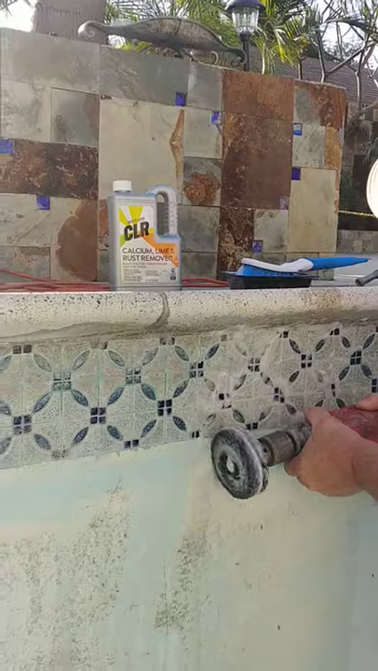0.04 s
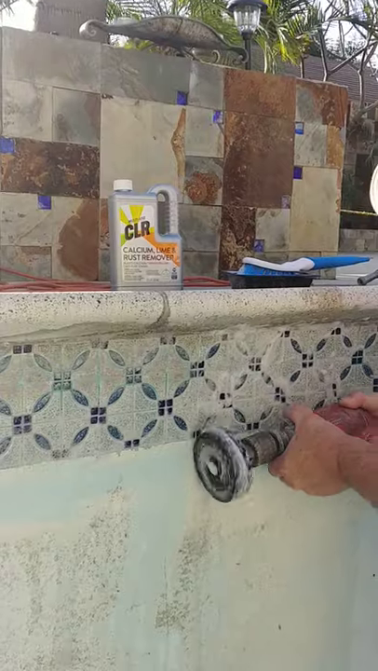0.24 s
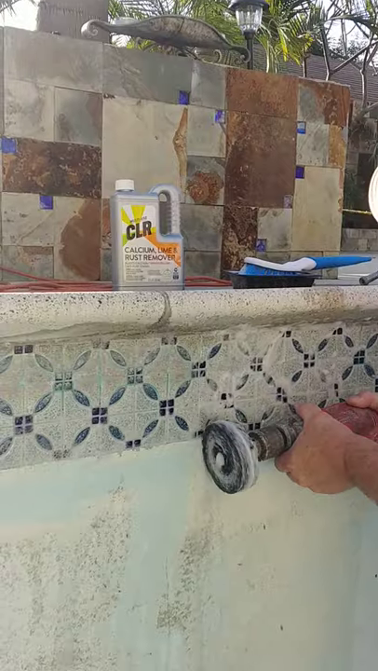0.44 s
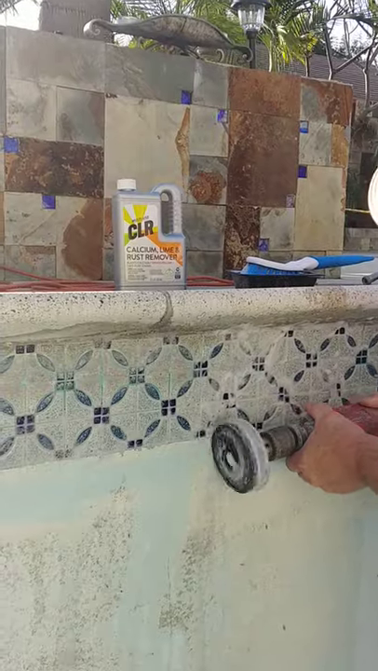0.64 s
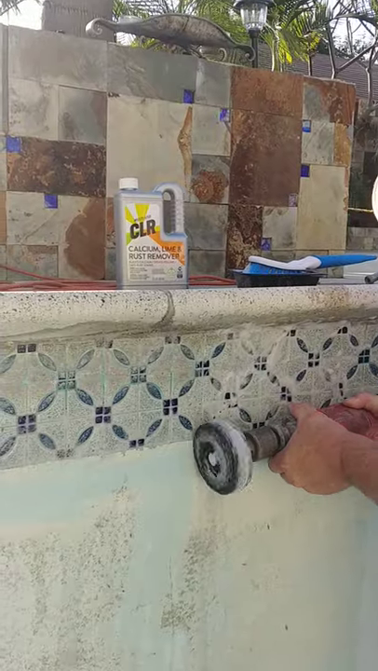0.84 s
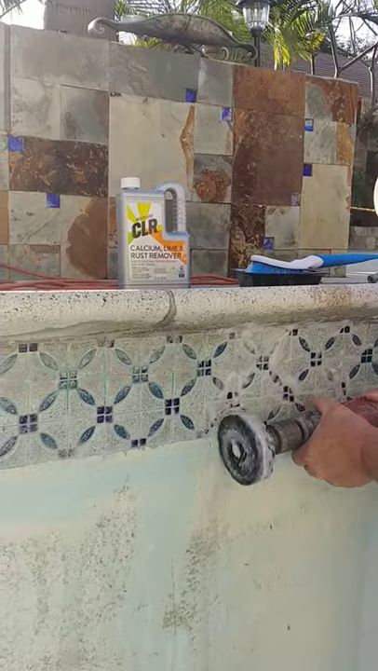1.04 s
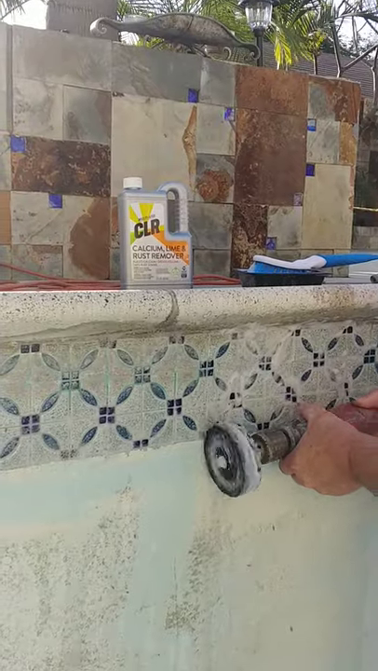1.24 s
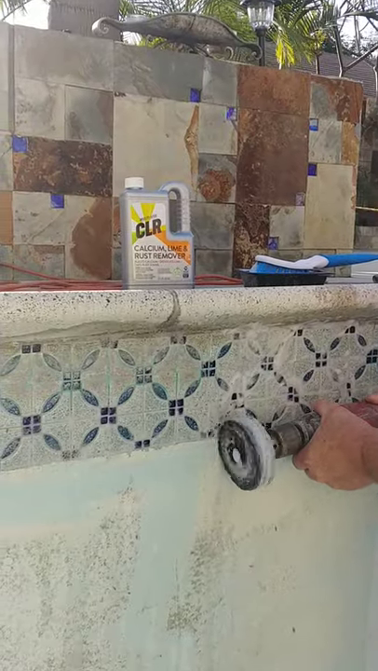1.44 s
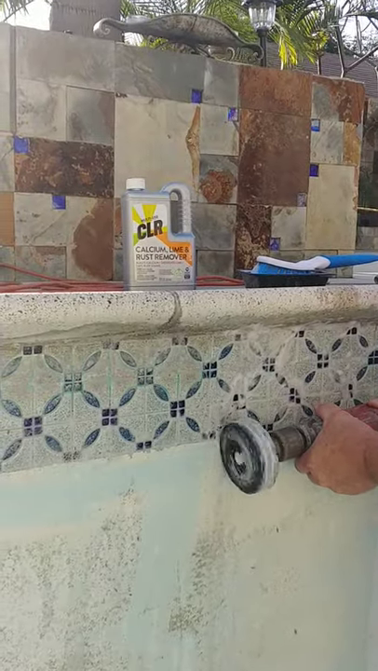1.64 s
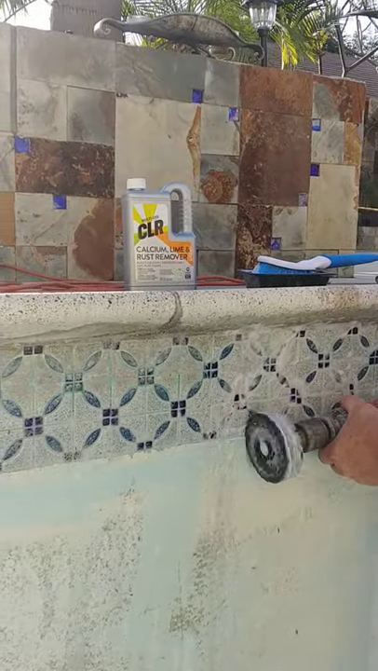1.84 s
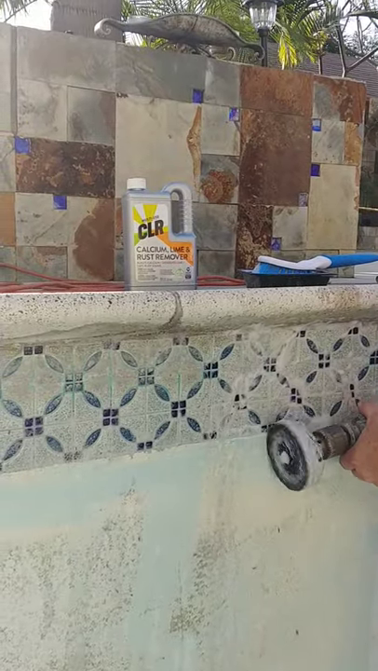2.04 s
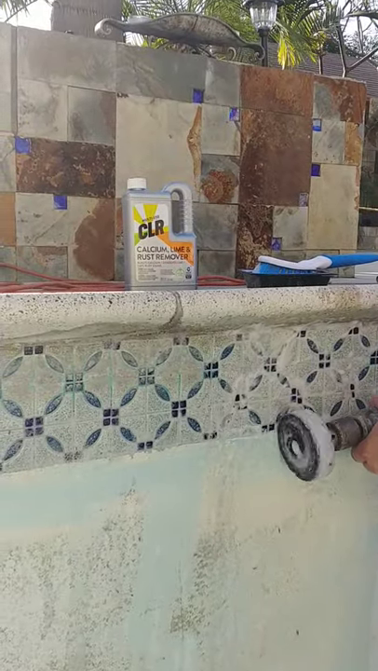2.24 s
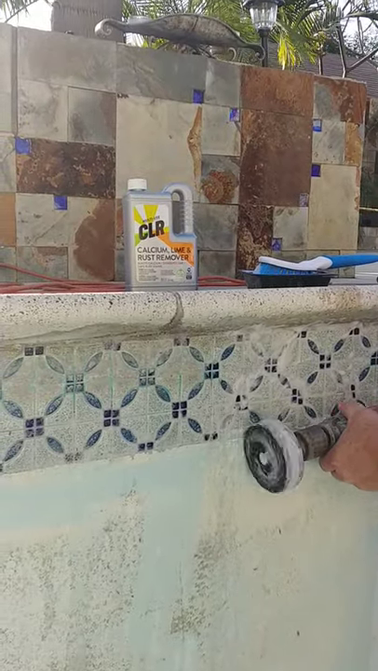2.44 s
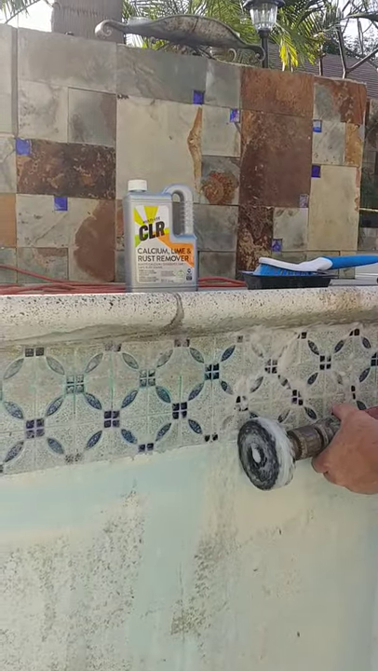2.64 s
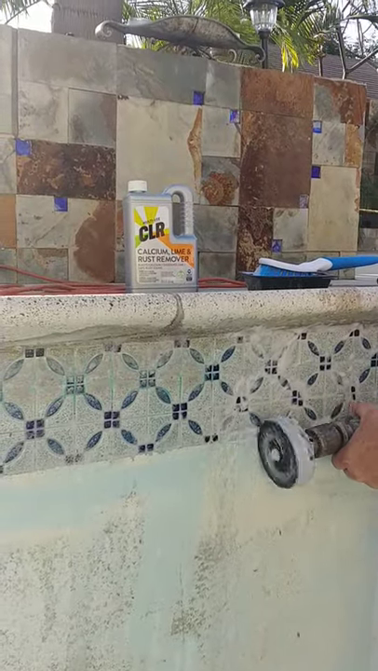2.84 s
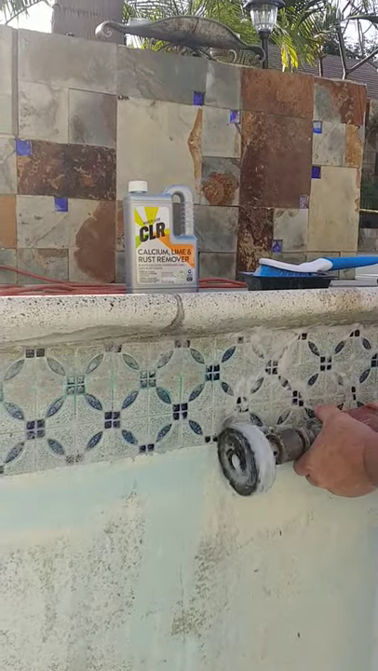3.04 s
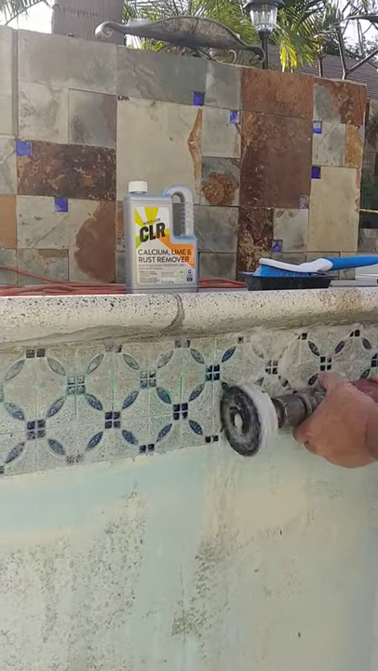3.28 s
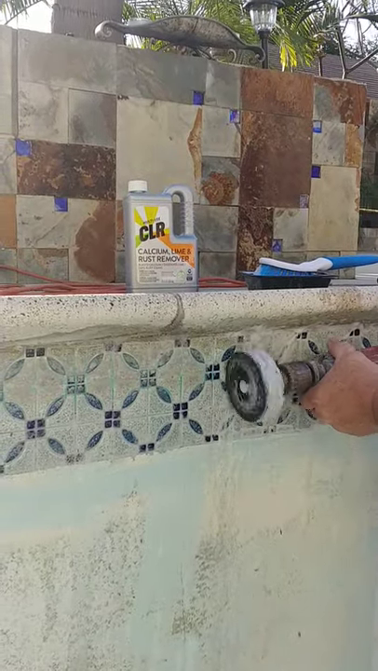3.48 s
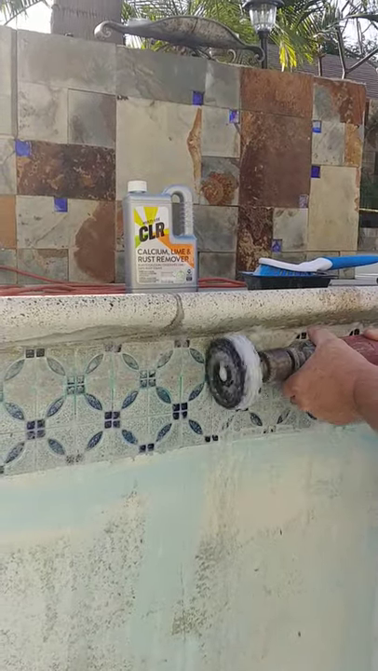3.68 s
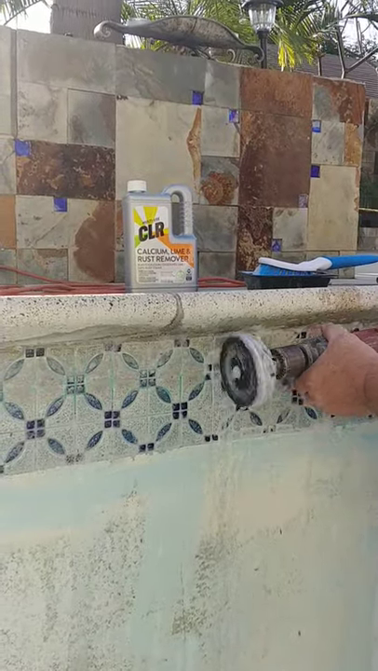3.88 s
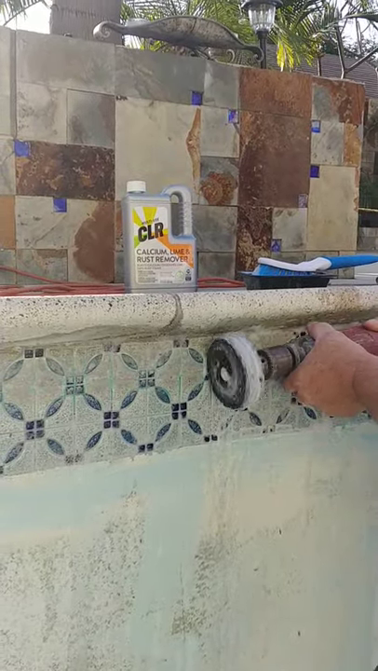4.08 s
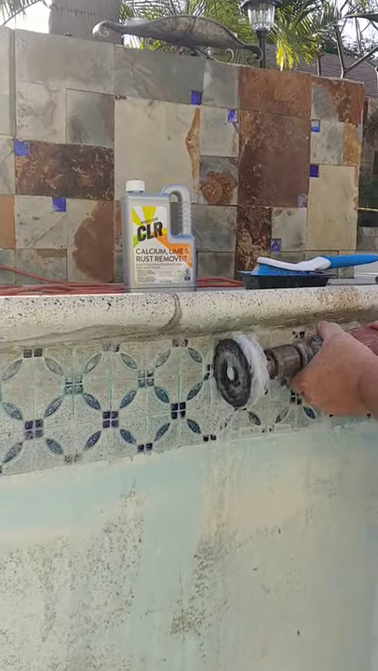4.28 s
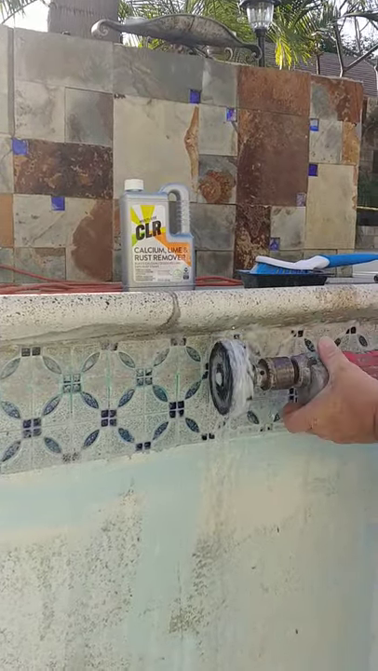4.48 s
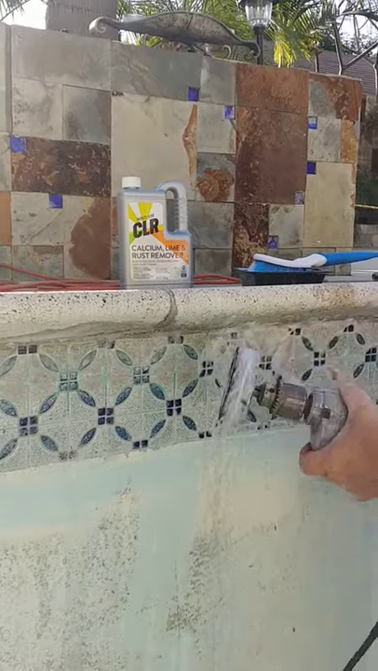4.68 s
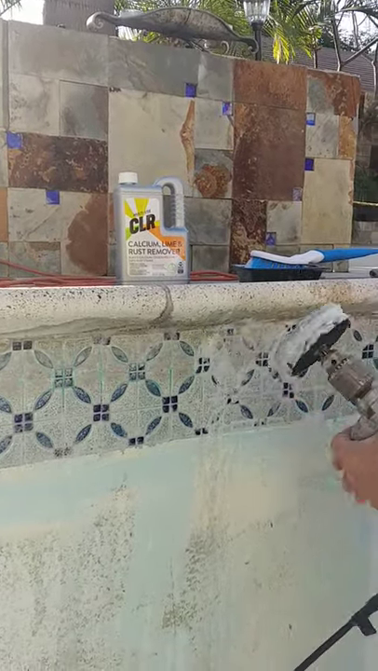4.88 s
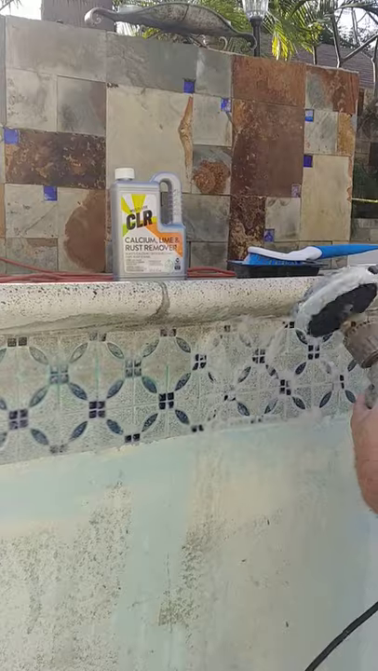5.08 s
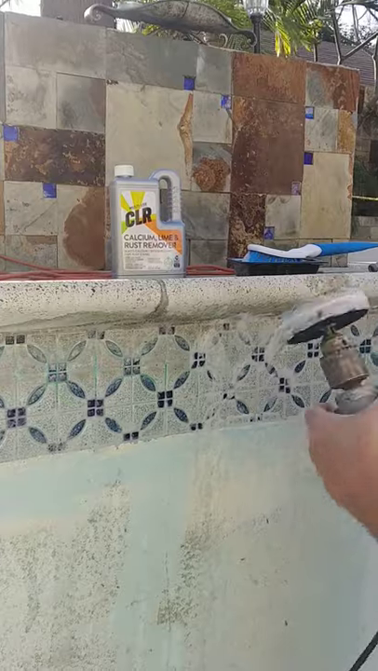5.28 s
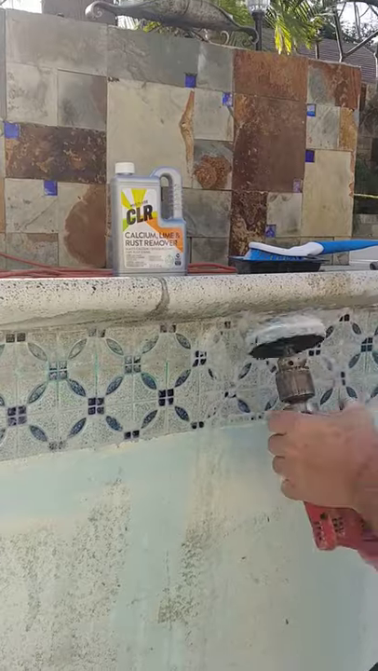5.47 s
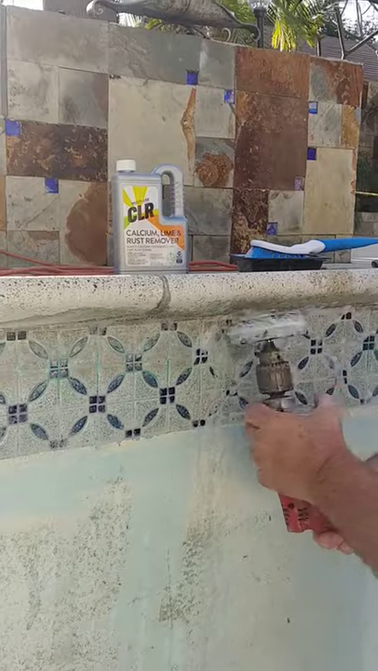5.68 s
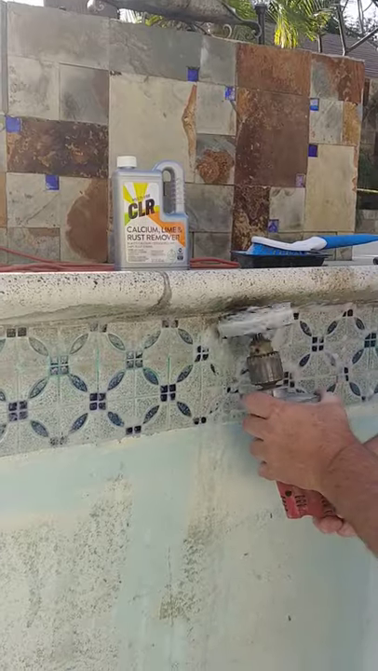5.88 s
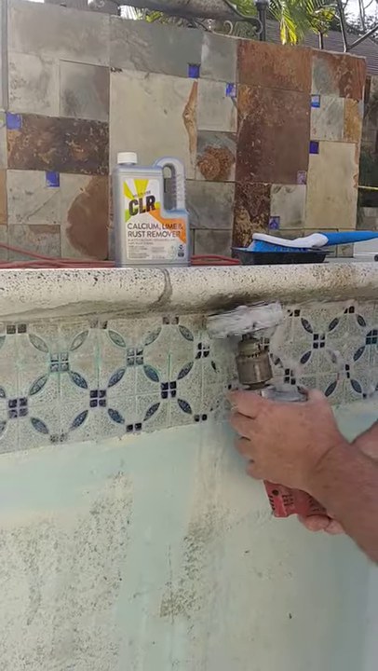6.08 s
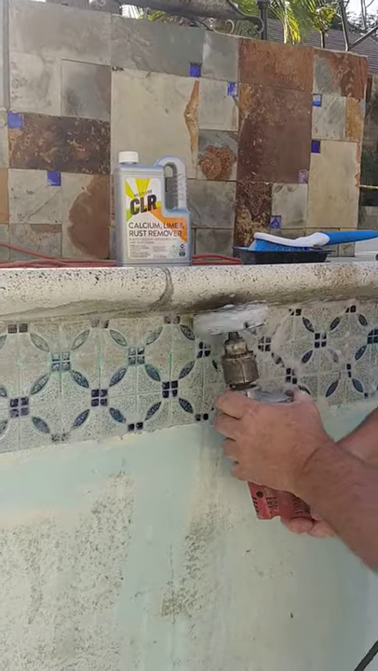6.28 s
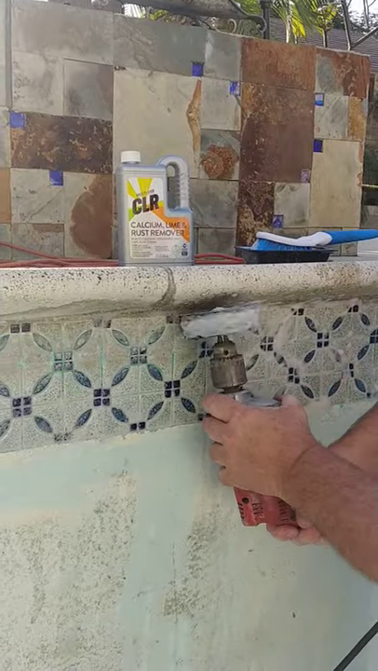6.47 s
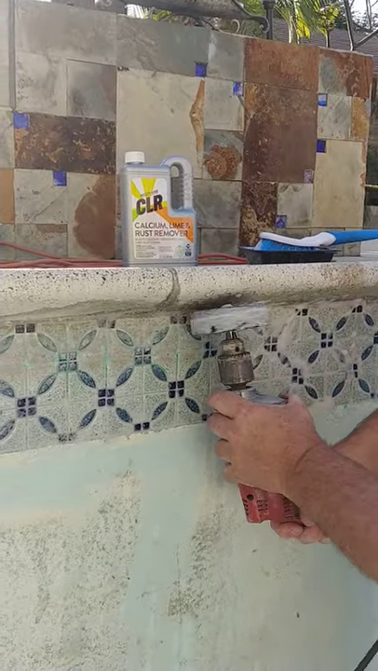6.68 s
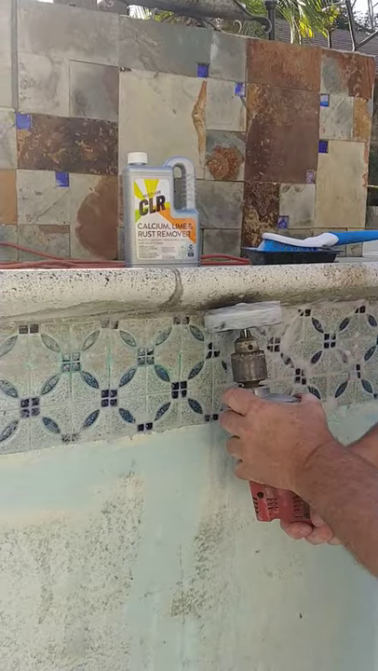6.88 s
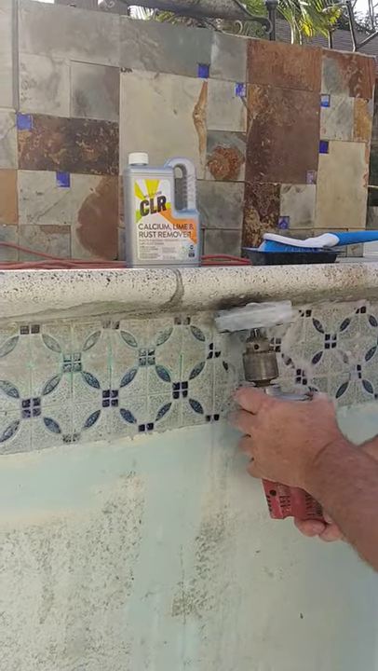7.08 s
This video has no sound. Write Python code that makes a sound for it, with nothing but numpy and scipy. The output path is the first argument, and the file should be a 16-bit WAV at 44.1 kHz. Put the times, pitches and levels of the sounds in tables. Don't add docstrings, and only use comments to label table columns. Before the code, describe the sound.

A power drill whines loudly over gritty grinding on wet tile, coasts down with rattling, then revs up and bites beneath stone.

```python
import sys
import numpy as np
from scipy import signal
from scipy.fft import rfft, irfft, next_fast_len
from scipy.io import wavfile
from scipy.ndimage import uniform_filter1d

SR = 44100
rng = np.random.default_rng(int(sys.argv[2]) if len(sys.argv) > 2 else 0)


def master_out(mix):
    frames = np.transpose(np.atleast_2d(mix))
    ceiling = np.clip(frames, -1, 1)
    pcm = np.round(ceiling * 32767).astype(np.int16)
    wavfile.write(sys.argv[1], SR, pcm)


def to_linear_factor(level_db):
    exponent = np.asarray(level_db, float) / 20
    return 10 ** exponent


N = 313992
FRAME, HOP = 1024, 256
MAINS_PULL_HZ = 120
SPINDLE_RATIO = 0.093
FULL_SPEED_HZ = 270
TRIGGER_OFF_S, LOOSE_UNTIL_S, POWER_ON_S = 4.45, 6.3, 5.7

# (time [s], speed [Hz])
ROTOR_SPEED = [(0, 273.8), (.8, 273.3), (2.16, 267.3), (3.1, 271.2), (3.55, 265.6), (4.3, 252.9),
               (4.42, 257), (4.5, 253.2), (5.15, 177), (5.4, 152.5), (5.73, 131.5), (5.9, 154.5),
               (6.0, 165.5), (6.24, 203), (6.42, 228), (6.6, 246.5), (6.82, 259), (7.12, 268.8)]
# (time [s], 0 on tile 1 high on tile 2 lifted 3 under coping, left over right [dB])
HOLD = [
    (0, 0.011, 1.4),
    (3.1, 0.022, 1.3),
    (3.6, 0.41, 0.2),
    (4.28, 0.46, 0.5),
    (4.36, 1.58, 1),
    (5.75, 1.84, 0.5),
    (6.1, 2.67, 0.1),
    (7.12, 2.5, -1),
]
# (time [s], 0 grinding 1 easing off 2 coasting 3 slow and catching 4 biting)
WORK_STAGE = [
    (0, 0),
    (3.4, 0),
    (3.9, 1),
    (4.27, 1),
    (4.34, 2),
    (5.4, 2),
    (5.62, 3),
    (6.54, 3),
    (6.62, 4),
    (7.12, 4),
]
# (time [s], unsteadiness [dB])
WHEEL_BOUNCE = [(0, .7), (3.5, .8), (4.2, 1.2), (4.4, .6), (5.0, 1.8), (5.35, .3), (5.78, .3), (6.05, 2.5),
                (6.5, 1.5), (7.12, .8)]
# (multiple of rotor speed, tone family 0-5, level over family [dB], left over right [dB])
WHINES = [(7, 0, 0, -4), (14, 1, 0, -1.5), (21, 2, 0, -7), (28, 2, -15, -6.5), (20, 2, -14, -3),
          (12, 3, 0, -6), (24, 3, -16, 0.5), (35, 4, 0, -12), (36, 4, -12, -9.5), (29, 4, -14, -3),
          (30, 4, -12, -2.5), (30.92, 4, -11, -8), (38, 4, -18, -12), (15, 5, 0, -5)]
FAMILY_DB = [
    (-23, -30, -50, -33, -27.5),
    (-38, -33, -48, -41, -33),
    (-36, -30, -44, -33, -26.5),
    (-34.5, -48, -41, -41.5, -34),
    (-37, -43, -42, -43, -35),
    (-45, -52, -45, -42, -38),
]
FAMILY_WANDER_DB = (1.2, 2, 2.2, 1.5, 1.2, 2.5)
# (time [s], half length [s], lift [dB])
WHEEL_BITES = [
    (6.06, .06, 12),
    (6.225, .05, 12),
]
# (time [s], half length [s], lift [dB])
CASE_SINGING = [(1.72, .3, 15), (2.52, .08, 10), (6.85, .2, 6)]
# (multiple of the pull, level [dB])
SLOT_BEATS = [(-2, -3.5), (-1.4, 0.5), (1, -9), (2.9, -10)]
# (multiple of rotor speed, case pitch [Hz], half width [Hz], lift powered [dB], lift coasting [dB])
CASE_CROSSINGS = [(12, 2540, 280, 21, 0), (12, 1680, 120, 0, 6), (14, 2420, 80, 9, 0),
                  (14, 3130, 90, 17, 8), (14, 3480, 130, 8, 0), (21, 3100, 300, 14, 0),
                  (21, 4050, 120, 12, 4), (28, 5600, 200, 10, 0), (35, 7600, 700, 12, 2),
                  (35, 5900, 400, 0, 10), (7, 1030, 60, 0, 6)]
# (multiple of rotor speed, level on tile [dB], change off tile [dB])
ROTOR_SHAKE = [(1, -48.5, -3), (2, -38.5, -10), (3, -43.5, -6)]
# (multiple of rotor speed, level [dB], spread [Hz], case pitch [Hz],
# reach [Hz])
LOOSE_GEARS = [(5.5, -31, 45, 1220, 110), (19, -30, 350, 3800, 300), (14.2, -28, 120, 3020, 110),
               (21.5, -29, 250, 4250, 170)]
# (pitch [Hz], level per Hz [dB])
TILE_COLOUR = [(120, -64), (200, -32.5), (456, -26), (532, -15.5), (1680, -13), (1930, -6), (2140, -11.5),
               (5580, -18.5), (6410, -22.5), (9670, -30.5), (12100, -42), (15700, -77), (22000, -120)]
HIGH_TILE_COLOUR = [(120, -50), (200, -22), (514, -9.5), (1370, -8.5), (1860, -5.5), (4390, -11.5),
                    (5490, -3), (6300, -21.5), (8290, -29.5), (12100, -37.5), (15700, -68), (22000, -120)]
LIFTED_COLOUR = [(120, -48), (200, -20), (282, -34), (505, -9), (1190, -2), (2250, -14), (4240, -6),
                 (6300, -15.5), (8290, -15.5), (12100, -29.5), (15700, -65), (22000, -120)]
COPING_COLOUR = [(120, -58), (200, -40), (541, -21), (1460, -19.5), (1800, -4.5), (1960, -10), (5400, -7.5),
                 (6410, -4), (9190, -15.5), (12100, -25.5), (15700, -66), (22000, -120)]
# (pitch [Hz], width [Hz], then lift on tile, high on tile, lifted, under coping [dB])
CASE_RINGING = [(1092, 200, 6, 7.1, 3.3, 6.3), (1530, 410, 2.4, 0.66, 1.8, 0.86),
                (1943, 130, 1.4, 9.5, 0.38, 0.92), (2255, 260, 1, 13.4, 0.31, 5.5),
                (2700, 700, 0.5, 0.27, 6.6, 6.6), (3297, 160, 2.1, 19.5, 3.2, 8.5),
                (3950, 250, 1.3, 2.1, 1.4, 5.7), (8000, 870, 4.9, 2.9, 1.2, 3.32)]
# (time [s], level [dB])
RATTLE_EFFORT = [(0, -15.5), (1.35, -15), (2.7, -16), (3.0, -15), (3.25, -16.5), (4.0, -16), (4.27, -16),
                 (4.43, -19.5), (4.95, -21.5), (5.3, -22), (5.41, -25), (5.8, -26), (5.95, -24),
                 (6.08, -17.5), (6.15, -18.5), (6.36, -16), (6.55, -15.5), (7.12, -15)]
WALL_BOOM_DB = (-7.5, -9, -7, -13, -12.5)
FAN_HISS_DB = (-9.5, -11.5, -9, -9.5, -9)
# (time [s], peak [dB])
GEAR_KNOCKS = [(4.9378, -10), (5.0024, -11), (5.0344, -11), (5.059, -8), (5.0724, -14), (5.1872, -10),
               (5.2274, -12), (5.8098, -13), (5.8714, -12), (5.9778, -10), (6.0203, -8), (6.0886, -9),
               (6.1151, -9), (6.1675, -12), (6.1924, -7), (6.4179, -5)]
# (time [s], peak [dB], decay [ms])
COPING_SCUFF = (5.853, -14.5, 31)
# (pitch [Hz], level per Hz [dB])
PUMP_COLOUR = [(20, -35), (36, -9), (55, 8), (75, 0), (155, -12), (300, -9), (420, -10), (660, -90)]
# (pitch [Hz], likeness [0-1])
STEREO_LIKENESS = [(30, .3), (60, 0.33), (140, 0.77), (350, 0.93), (700, 0.95), (1300, 0.8), (2500, 0.6),
                   (4840, 0.29), (8000, 0.36), (11600, .2)]
# (pitch [Hz], left over right [dB])
STEREO_LEAN = [(60, -6), (140, 2), (350, -1.5), (840, -2), (2010, -5.5), (4840, -3.5), (9500, -9.5),
               (11300, -12.5), (12000, 19)]
# (pitch [Hz], left ahead of right [radians])
STEREO_LEAD = [(600, 0), (1800, -.4), (2600, .3), (4000, .7), (8000, .2), (11000, 1.5)]
# (pitch [Hz], gain [dB])
HOUSING_GAIN = [(4800, 0.16), (5700, 3), (6000, -7.5), (6500, -9.5), (7400, -2.84), (10800, 1),
                (11600, -5.5), (12200, -1)]


def whine(turns, rotor_hz):
    s = np.arange(N) / SR
    out = np.zeros((2, N))
    levels = tone_levels(rotor_hz)
    coasting = running_loose(s)
    powered = (s < TRIGGER_OFF_S) | (s > POWER_ON_S)
    bounce_db = in_time(WHEEL_BOUNCE, s)[0]
    slack = np.maximum(coasting, np.clip(0.25 * bounce_db - 0.12, 0, 1))
    slack = slack * to_linear_factor(-bell_swells(WHEEL_BITES, s)) * np.where(powered, 0.45, 1)
    special = {
        7: 1 + 0.21 * np.exp(-2j * np.pi * SPINDLE_RATIO * turns),
        12: slot_beat(rotor_hz, s, coasting),
        21: resonance(21 * rotor_hz, 3300, 130, 7),
        28: resonance(28 * rotor_hz, 5600, 300, 15),
        35: to_linear_factor((5 + 5 * drift(9)) * coasting)}
    for multiple, family, rel_db, pan_db in WHINES:
        unsteady_db = 1.5 * drift(16.3)
        unsteady_db += 2.37 * np.minimum(bounce_db, 1.2) * drift(64)
        for k, case_hz, half_hz, on_db, off_db in CASE_CROSSINGS:
            if k == multiple:
                lift_db = np.where(powered, on_db, off_db)
                unsteady_db += lift_db / (1 + ((k * rotor_hz - case_hz) / half_hz) ** 2)
        tone = to_linear_factor(levels[family] + rel_db + unsteady_db) * np.exp(2j * np.pi * multiple * turns)
        tone = tone * special.get(multiple, 1)
        if family in (0, 1, 2, 5):
            slap = drift(70) + 1j * drift(70)
            tone = tone * (1 - slack + 0.8 * slack * slap)
        left = to_linear_factor(pan_db / 2) * np.exp(1j * rng.random())
        right = to_linear_factor(-pan_db / 2)
        out += np.real([tone * left, tone * right]) * 2 / np.hypot(abs(left), right)
    return out


def tone_levels(rotor_hz):
    s = np.arange(N) / SR
    speed_db = 14 * np.log2(rotor_hz / FULL_SPEED_HZ)
    levels = []
    for stage_db, wander_db in zip(FAMILY_DB, FAMILY_WANDER_DB):
        levels.append(staged(stage_db, s) + speed_db + wander_db * drift(4.7))
    for family, share in enumerate((1, 0.6, 0.3)):
        levels[family] = levels[family] + share * bell_swells(WHEEL_BITES, s)
    levels[-1] = levels[-1] + bell_swells(CASE_SINGING, s)
    return levels


def slot_beat(rotor_hz, s, coasting):
    pull = sum(to_linear_factor(db) * np.exp(2j * np.pi * (k * MAINS_PULL_HZ * s + rng.random())) for k, db in SLOT_BEATS)
    beat = 1 + (1 - coasting) * (rotor_hz / FULL_SPEED_HZ) ** 2 * pull
    return beat * resonance(12 * rotor_hz, 1680, 100, 13)


def rotor_shake(turns, rotor_hz):
    s = np.arange(N) / SR
    off_tile = np.clip(in_time(HOLD, s)[0] - 1, 0, 1)
    out = np.zeros(N)
    for multiple, level_db, lost_db in ROTOR_SHAKE:
        shake_db = level_db - 0.5 + lost_db * off_tile + 1.8 * drift(3)
        out += to_linear_factor(shake_db) * (rotor_hz / FULL_SPEED_HZ) ** 3 * np.sin(2 * np.pi * multiple * turns)
    return out


def loose_gears(turns, rotor_hz):
    coasting = running_loose(np.arange(N) / SR)
    out = np.zeros((2, N))
    for multiple, level_db, spread_hz, case_hz, reach_hz in LOOSE_GEARS:
        rough = drift(spread_hz) + 1j * drift(spread_hz)
        band = np.real(rough * np.exp(2j * np.pi * multiple * turns))
        nearness = np.exp(-0.5 * ((multiple * rotor_hz - case_hz) / reach_hz) ** 2)
        out += to_linear_factor(level_db) * coasting * nearness * band * to_linear_factor([[-1.5], [1.5]])
    return out


def rattle(turns):
    def gain_db(hz, s):
        hold = np.clip(in_time(HOLD, s)[0], 0, 3)
        weights = [np.clip(1 - abs(hold - k), 0, 1) for k in range(4)]
        colours = TILE_COLOUR, HIGH_TILE_COLOUR, LIFTED_COLOUR, COPING_COLOUR
        shape = sum(w * at_hz(colour, hz) for w, colour in zip(weights, colours))
        for centre_hz, width_hz, *lift_db in CASE_RINGING:
            lift = np.dot(lift_db, weights) + 0.54 * at_frames(drift(5.1), s)
            shape = shape + lift / (1 + (2 * (hz - centre_hz) / width_hz) ** 2)
        low = np.clip((1800 - hz) / 600, 0, 1)
        top = np.clip((hz - 5700) / 400, 0, 1)
        parts = (low, staged(WALL_BOOM_DB, s)), (top, staged(FAN_HISS_DB, s)), (1 - low - top, 0)
        evened = 0
        for part, part_db in parts:
            power = np.sum(part * to_linear_factor(2 * shape), axis=0) * 2 / FRAME
            evened = evened + part * (part_db - 10 * np.log10(power))
        patches = rng.standard_normal(shape.shape)
        patches = uniform_filter1d(patches, size=14, axis=0)
        patches = uniform_filter1d(patches, size=10, axis=1)
        bounce = in_time(WHEEL_BOUNCE, s)[0] * at_frames(drift(68), s)
        bounce = bounce * (1 - top) * (1 - 0.5 * low)
        effort_db = in_time(RATTLE_EFFORT, s)[0] - 2.15
        return shape + evened + effort_db + bounce + 0.91 * rms_one(patches)
    mid, side = grit(turns)
    return coloured(mid, side, gain_db, lambda s: in_time(HOLD, s)[1])


def grit(turns):
    s = np.arange(N) / SR
    pulse = 1 + 0.04 * np.sin(2 * np.pi * MAINS_PULL_HZ * s)
    pulse *= 1 + 0.013 * np.sin(2 * np.pi * SPINDLE_RATIO * turns)
    pulse *= to_linear_factor(-0.35 * drift(6.8))
    sizes = to_linear_factor(4.5 * np.minimum(rng.exponential(1, N), 5)) * rng.choice([-1, 1], N)
    grains = rms_one(sizes * (rng.random(N) < 1500 / SR))
    hiss = rng.standard_normal((2, N))
    return pulse * rms_one(hiss[0] + 0.4 * grains), pulse * hiss[1]


def knocks():
    envelope = np.full(N, 1e-9)
    blows = [(at_s, peak_db, 4.5) for at_s, peak_db in GEAR_KNOCKS]
    for at_s, peak_db, decay_ms in blows + [COPING_SCUFF]:
        start = round(at_s * SR)
        after = np.arange(min(3000, N - start)) / SR
        envelope[start:start + 3000] += to_linear_factor(peak_db + 2.5) * np.exp(-1000 * after / max(decay_ms, 1))
    case = signal.butter(2, [1300, 5400], "band", fs=SR, output="sos")
    left, right = signal.sosfilt(case, envelope * rng.standard_normal((2, N)))
    return np.array([to_linear_factor(-5.5) * (0.85 * right + 0.47 * left), right])


def pump():
    noise = coloured(*rng.standard_normal((2, N)), lambda hz, s: at_hz(PUMP_COLOUR, hz) + 0 * s, lambda s: 0 * s)
    handling_db = bell_swells([(6.15, 0.3, 3.8)], np.arange(N) / SR)
    level_db = -51.5 + 0.2 * drift(3) + handling_db + 3.5
    return to_linear_factor(level_db) * rms_one(noise)


def coloured(mid, side, gain_db, pan_db):
    hz, s, spectra = signal.stft([mid, side], SR, nperseg=FRAME, noverlap=FRAME - HOP)
    hz = np.maximum(hz, 10)[:, None]
    alike = np.clip(at_hz(STEREO_LIKENESS, hz), 0, 1)
    lean = to_linear_factor((at_hz(STEREO_LEAN, hz) + pan_db(s)) / 2) * np.exp(0.5j * at_hz(STEREO_LEAD, hz))
    common = np.sqrt(1 + alike) * spectra[0]
    apart = np.sqrt(1 - alike) * spectra[1]
    pair = np.array([(common + apart) * lean, (common - apart) / lean]) * to_linear_factor(gain_db(hz, s))
    return signal.istft(pair / np.sqrt(2), SR, nperseg=FRAME, noverlap=FRAME - HOP)[1][:, :N]


def running_loose(s):
    return np.clip(np.minimum(s - TRIGGER_OFF_S, LOOSE_UNTIL_S - s) / 0.19, 0, 1)


def resonance(hz, centre_hz, half_hz, lift_db):
    return to_linear_factor(lift_db / (1 + ((hz - centre_hz) / half_hz) ** 2))


def drift(rate):
    r = np.exp(-80 * np.pi * rate / SR)
    slow = signal.lfilter([1], [1, -2 * r, r * r], rng.standard_normal(N // 40 + 2002))[2000:]
    return np.interp(np.arange(N) / 40, np.arange(len(slow)), rms_one(slow))


def bell_swells(rows, s):
    return sum(db * np.exp(-((s - at_s) / max(half_s, 0.01)) ** 4) for at_s, half_s, db in rows)


def staged(values, s):
    return np.interp(in_time(WORK_STAGE, s)[0], np.arange(len(values)), values)


def in_time(rows, at):
    s, *columns = np.transpose(rows)
    return [np.interp(at, s, column) for column in columns]


def at_frames(values, s):
    return np.interp(s * SR, np.arange(N), values)


def at_hz(points, hz):
    table_hz, values = np.transpose(points)
    return np.interp(np.log(hz), np.log(table_hz + 1), values)


def rms_one(x):
    return x / np.sqrt(np.mean(x ** 2) + 1e-20)


def scene():
    s, hz = np.transpose(ROTOR_SPEED)
    rotor_hz = np.exp(np.interp(np.arange(N) / SR, s, np.log(hz)))
    turns = np.cumsum(rotor_hz * (1 + 0.000442 * drift(23.4))) / SR
    drill = whine(turns, rotor_hz) + rotor_shake(turns, rotor_hz) + loose_gears(turns, rotor_hz)
    return drill + rattle(turns) + knocks() + pump()


def low_pass(x):
    return signal.sosfilt(signal.butter(12, 12240, fs=SR, output="sos"), x)


def record(dry):
    size = next_fast_len(N)
    hz = np.maximum(np.fft.rfftfreq(size, 1 / SR), 10)
    housing = to_linear_factor(at_hz(HOUSING_GAIN, hz))
    heard = irfft(rfft(dry, size) * housing, size)[:, :N]
    mix = 1.284 * np.tanh(heard / 1.336)
    return low_pass(mix)


dry = scene()
out = record(dry)
master_out(out)
```